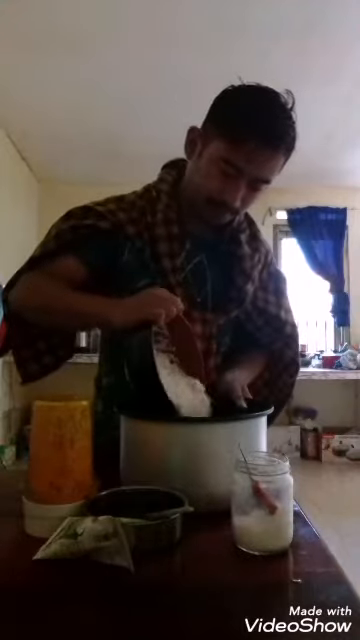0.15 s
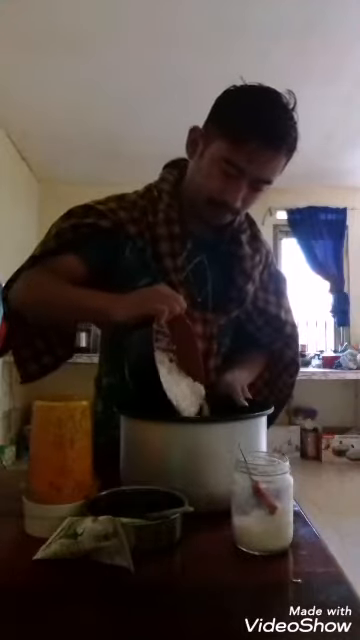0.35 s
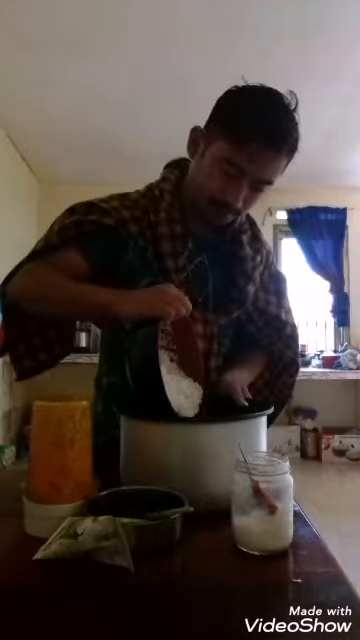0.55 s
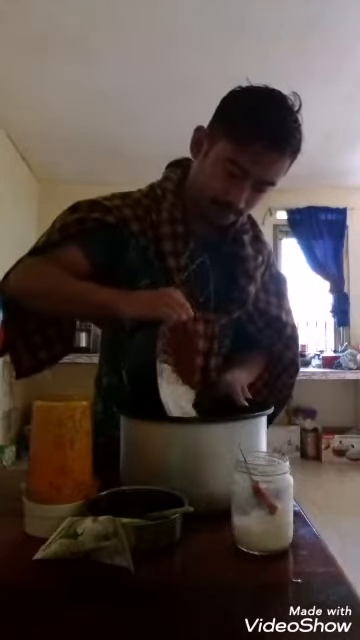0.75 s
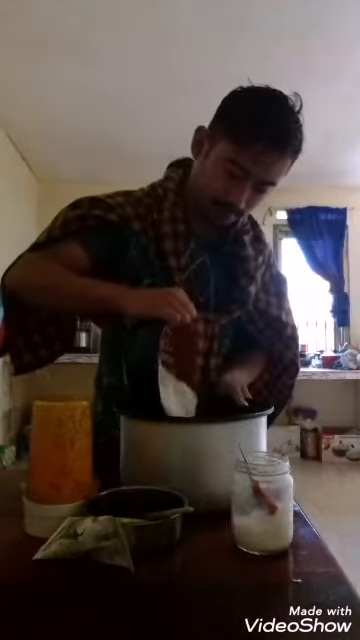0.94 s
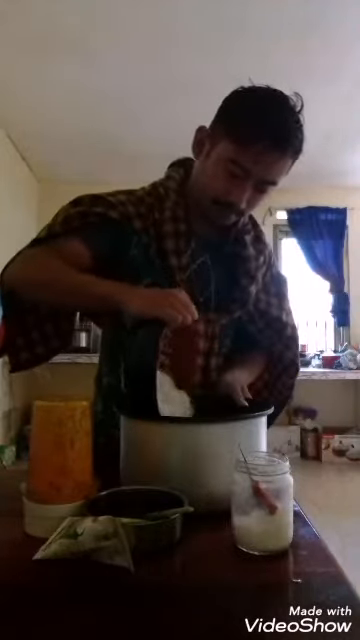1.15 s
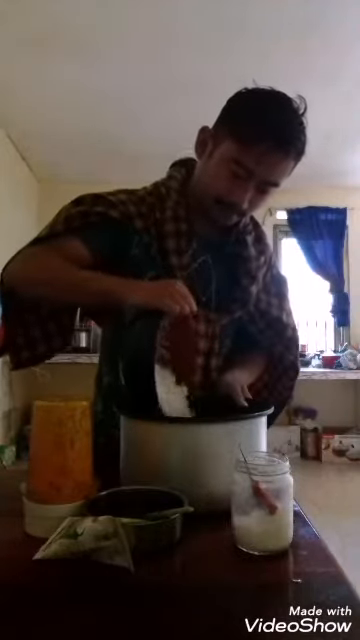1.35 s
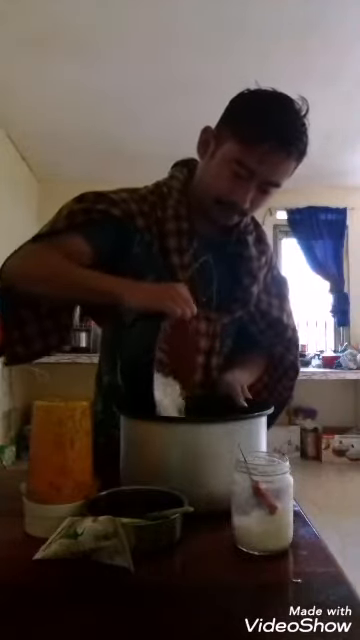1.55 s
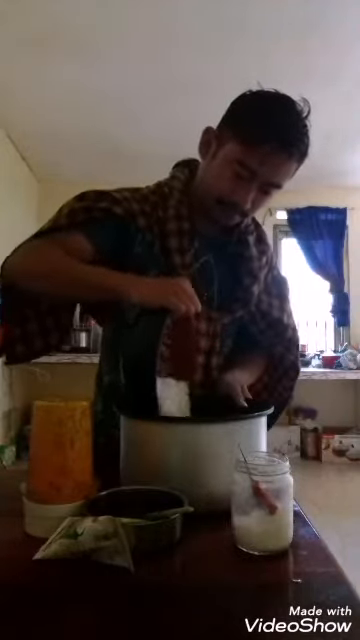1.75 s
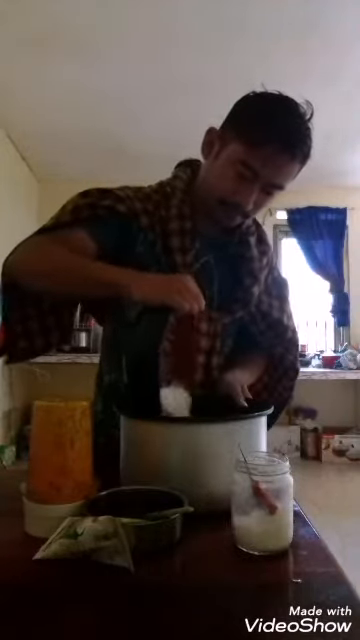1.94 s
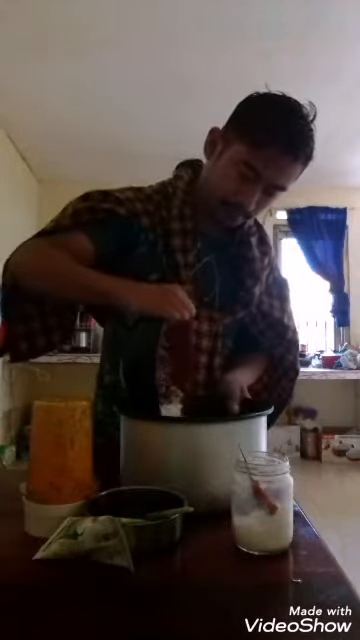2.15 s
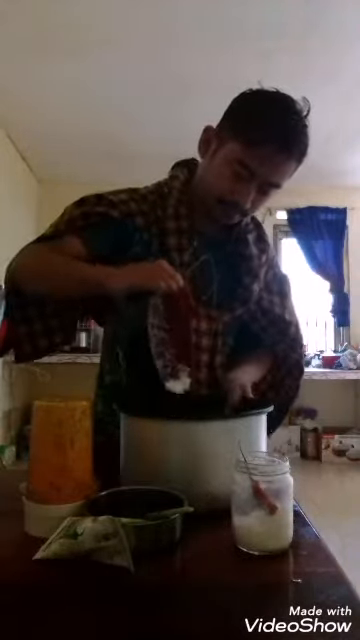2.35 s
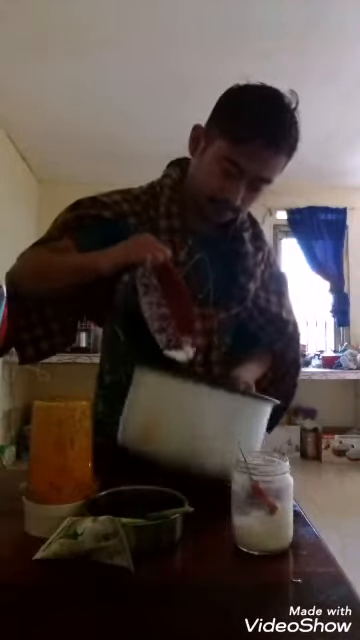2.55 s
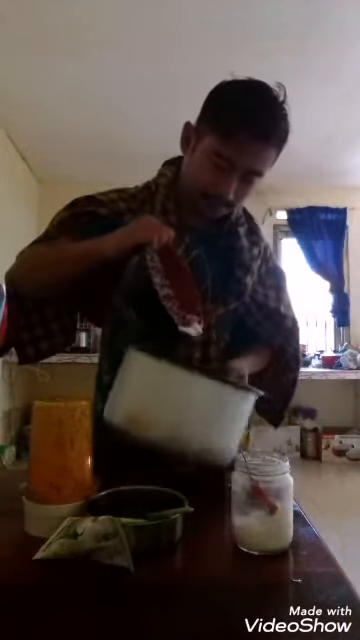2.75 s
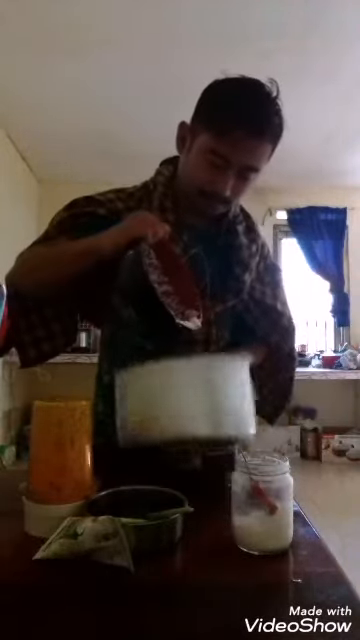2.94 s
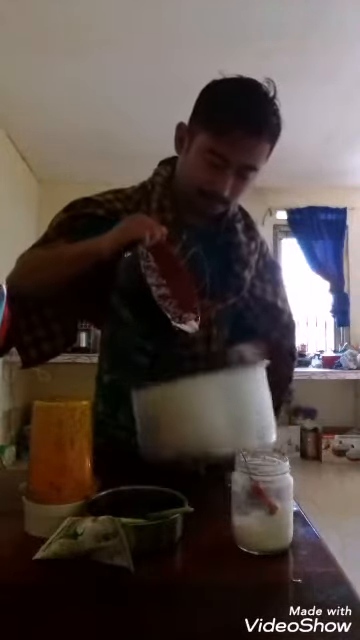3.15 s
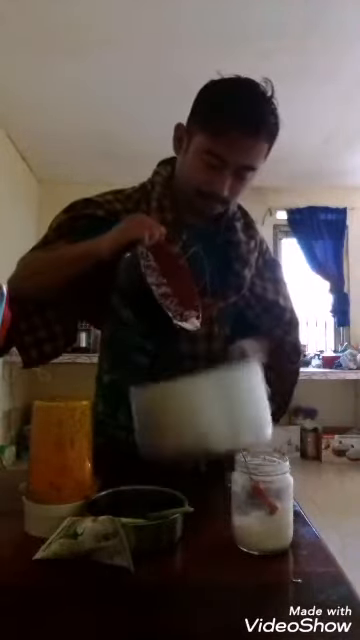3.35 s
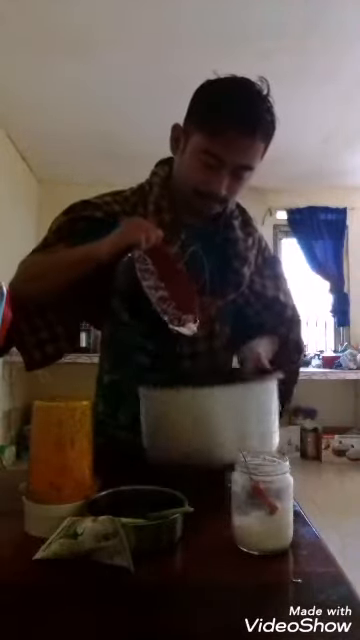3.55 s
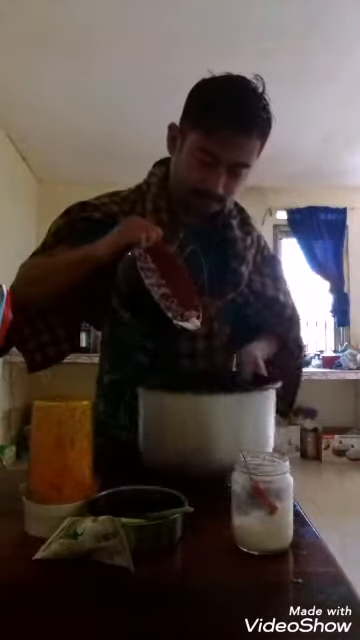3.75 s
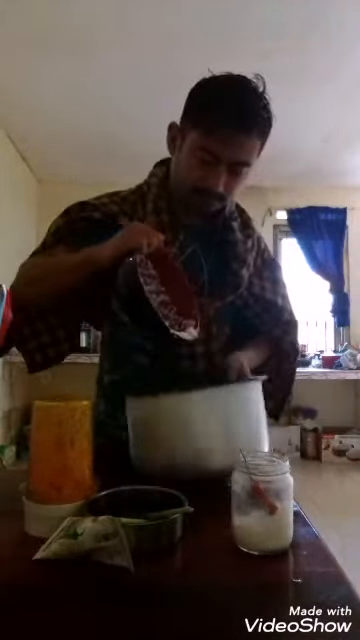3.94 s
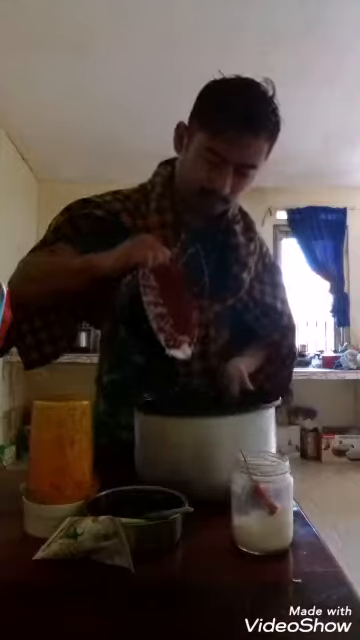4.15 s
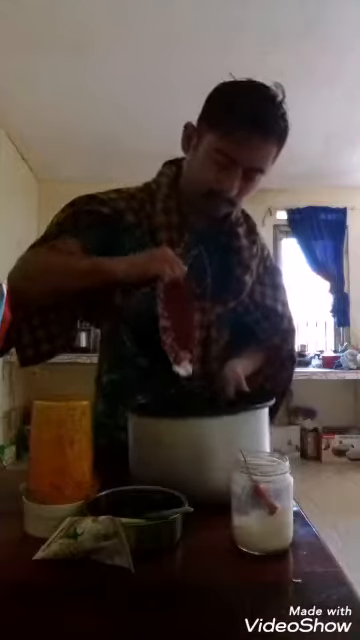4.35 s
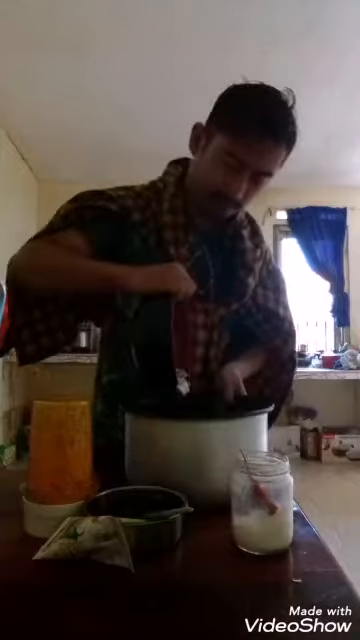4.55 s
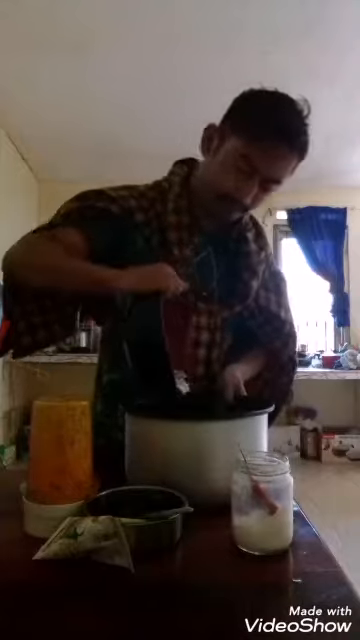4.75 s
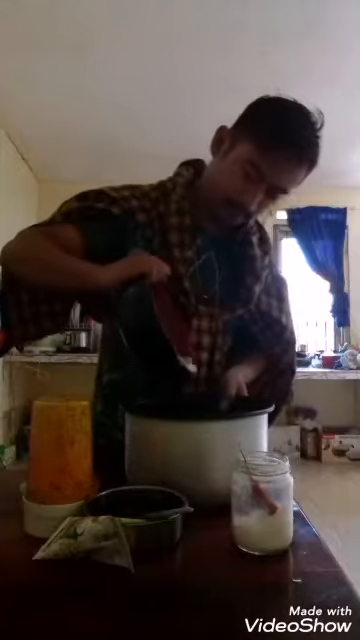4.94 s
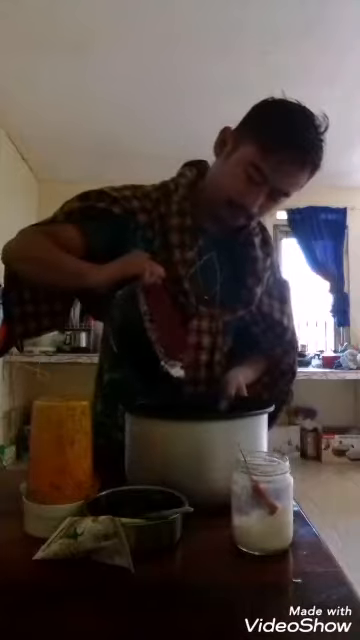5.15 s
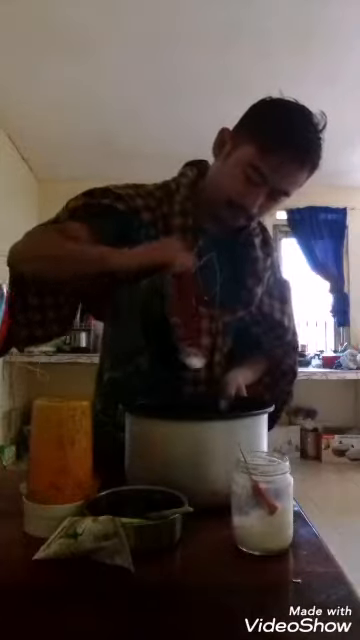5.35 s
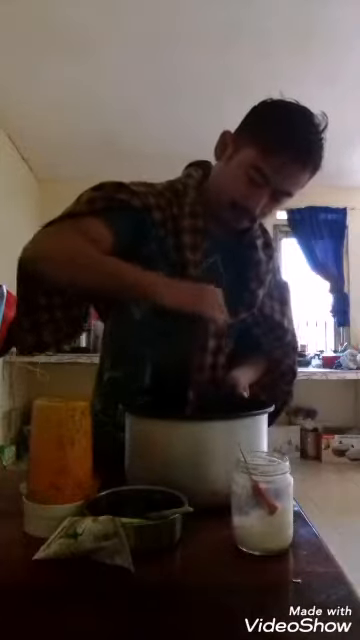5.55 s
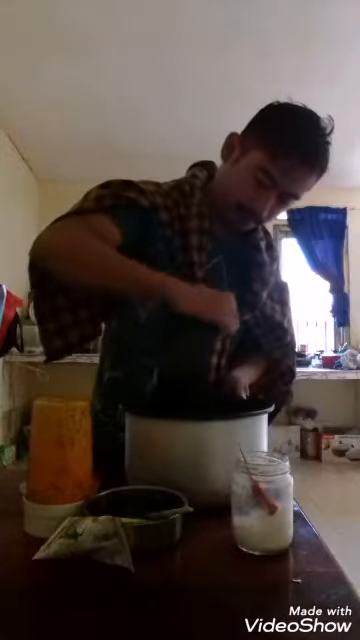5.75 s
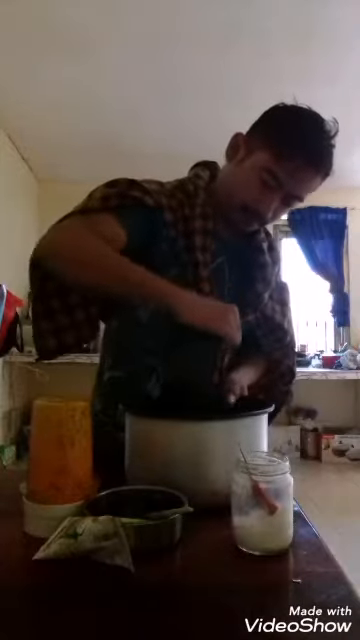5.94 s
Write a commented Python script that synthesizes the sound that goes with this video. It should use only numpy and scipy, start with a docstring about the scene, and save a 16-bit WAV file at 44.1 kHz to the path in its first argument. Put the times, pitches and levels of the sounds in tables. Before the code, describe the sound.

In a bare, ringing kitchen, pouring rice dwindles in clumps; the pot clanks, swishes, thuds rocking onto the table, and last grains tick out.

```python
"""Raw rice pours from a plastic tub into a metal pot in a bare, ringing kitchen: slides thin to a trickle.
Clumps drop out of the stream, the base knocks on the table, then the lifted pot clanks against the tub.
A swirl makes the rice swish; the pot is set down rocking on wood, and the last grains are shaken out
with the tub tapping and scraping on the rim. Grains are random impulses sent through spectra; blows are
noise bursts, with damped modes for pot and table; the room answers with a decaying noise tail."""
import sys
import numpy as np
from scipy import signal
from scipy.fft import rfft, irfft, next_fast_len
from scipy.io import wavfile
from scipy.ndimage import uniform_filter1d, map_coordinates

SR = 44100
rng = np.random.default_rng(int(sys.argv[2]) if len(sys.argv) > 2 else 0)


def dump_mix(stems):
    """Bounce the given channels to the path in sys.argv[1] as a 16-bit WAV at rate SR."""
    frames = np.atleast_2d(stems).T  # one column per channel
    limited = np.clip(frames, -1, 1)  # hard clip at full scale
    pcm = np.round(limited * 32767).astype(np.int16)
    wavfile.write(sys.argv[1], SR, pcm)


N = 265041
TIME = np.arange(N) / SR


def amp(db):
    """Level: decibels to amplitude ratio."""
    return 10 ** (np.asarray(db) / 20)


def unit(x):
    """Normalisation: the signal scaled to an rms of 1."""
    return x / np.sqrt(np.mean(x ** 2) + 1e-20)


def along(points, hz):
    """Interpolation: (Hz, value) points read on a logarithmic frequency axis."""
    point_hz, value = np.transpose(points)
    return np.interp(np.log(hz + 1), np.log(point_hz + 1), value)


def filtered(x, response):
    """Linear filtering: the spectrum is multiplied by a response of frequency."""
    m = next_fast_len(x.shape[-1] + SR // 4)
    spectrum = rfft(x, m) * response(np.fft.rfftfreq(m, 1 / SR))
    return irfft(spectrum, m)[..., :x.shape[-1]]


def add(track, s, sound):
    """Superposition: a sound is mixed into the track from time s on."""
    part = track[round(s * SR):][:len(sound)]
    part += sound[:len(part)]


def swell(s, rise, hold, fall):
    """Envelope: a Gaussian rise to 1 at time s, a hold, then exponential decay (time constant fall)."""
    rising = ((TIME - s) / rise) ** 2
    falling = np.maximum(TIME - s - hold, 0) / fall
    return np.exp(-np.where(TIME < s, rising, falling))


def steady(spectrum, db):
    """Stationary noise: random samples shaped by a spectrum, at a constant level."""
    return amp(db) * unit(filtered(rng.standard_normal(N), lambda hz: amp(along(spectrum, hz))))


def impacts(per_s, size_db):
    """Random impulse process: tiny contacts of uneven size and either sign at random times."""
    hit = rng.random(N) < per_s / SR
    size = amp(size_db * np.clip(rng.standard_normal(N), -2, 2))
    return hit * rng.choice([-1, 1], N) * size


def burst(spectrum, t, t60):
    """Transient excitation: dying noise with an evened spectrum, coloured by a minimum-phase filter."""
    m, fade = 2 * len(t), amp(-60 * t / t60)
    puff = rng.standard_normal(len(t)) * fade
    for _ in range(3):  # flatten the spectrum, then restore some of the decay
        z = rfft(puff, m)
        puff = irfft(z / (np.abs(z) + 1e-12), m)[:len(t)] * fade ** .25
    # a one-sided cepstrum makes the colour causal
    cepstrum = irfft(np.log(amp(along(spectrum, np.fft.rfftfreq(m, 1 / SR)))), m)[:len(t)]
    cepstrum[1:] *= 2
    puff = irfft(rfft(puff, m) * np.exp(rfft(cepstrum, m)), m)[:len(t)]
    return puff * np.linalg.norm(fade) / np.linalg.norm(puff)


def ring(modes, t):
    """Modal vibration: damped sines of alternate sign, their strengths varied at random by about 1 dB."""
    hz, db, t60 = np.transpose(modes)[:, :, None]
    sign = (-1) ** np.arange(len(hz))[:, None]
    level = db + rng.standard_normal(db.shape) - 60 * t / t60
    return sign * amp(level) * np.sin(2 * np.pi * hz * t)


def radiated(x, corner_hz):
    """Radiation efficiency: a small object hardly radiates deep bass."""
    return signal.lfilter(*signal.butter(2, corner_hz, "high", fs=SR), x)


# Quiet air of the house. Each row: frequency in Hz, relative density in dB per Hz.
HOUSE_COLOUR = [(30, -14.5), (70, -25.5), (158, -12.5), (228, -20.5), (347, -17), (590, -19), (1480, -18),
                (2020, -20), (2200, -18.5), (5230, -35), (12800, -36.5), (16000, -43)]


def house():
    """Background noise: the steady sound of the quiet house."""
    return steady(HOUSE_COLOUR, db=-69.5)


# Faint wide hiss. Each row: frequency in Hz, relative density in dB per Hz.
HISS_COLOUR = [(12, -31.5), (20, -7), (228, -6), (499, -2), (574, -1.5), (849, -1), (3630, -5), (4540, -6),
               (13200, -13.5), (16000, -20.5)]


def hiss():
    """Broadband noise: a steady faint hiss, heard at the sides."""
    return steady(HISS_COLOUR, db=-71.0)


def evened(tail):
    """Diffuse field: the echo keeps its fine spectral grain but favours no band."""
    z = rfft(tail, 2 * SR)
    power = np.abs(z) ** 2
    near, far = (np.abs(uniform_filter1d(power, size=width)) for width in (120, 1200))
    return irfft(z * np.sqrt(far / (near + 1e-12)))[:, :SR]


# Reverberation of the kitchen. Each row: frequency in Hz, decay time t60 in seconds.
KITCHEN_DECAY = [(120, 1), (450, 0.46), (1000, 0.85), (3000, 0.74), (6000, 0.77), (10000, 0.58),
                 (15000, 0.48)]


def kitchen(x, wet_db):
    """Reverberation: a central direct sound, answered by the bare walls from all round (mid, side)."""
    hz, t, z = signal.stft(rng.standard_normal((2, SR)), SR, nperseg=256)
    decay = amp(-60 * t / along(KITCHEN_DECAY, hz)[:, None])
    build_up = 1 - np.exp(-t / 0.0021)
    tail = evened(signal.istft(z * decay * build_up, SR, nperseg=256)[1])
    mids = np.abs(rfft(tail[0], SR))[400:4000]  # bins are 1 Hz apart
    tail = tail / np.sqrt(np.mean(mids ** 2))
    echo = amp(wet_db) * signal.oaconvolve(x[None], tail, axes=1)[:, :len(x)]
    return np.array([x + echo[0], echo[1]]) / np.sqrt(1 + amp(wet_db) ** 2)


# Wall resonances that the grains excite. Each row: centre in Hz, width in Hz, level in dB.
WALL_MODES = [(1058, 70, 3), (1620, 81, 0), (1884, 160, -9.5), (2780, 80, 9.5), (2990, 38, 4.5),
              (3376, 85, 12), (3670, 220, 7), (4680, 72, 0), (4820, 86, -6.5), (6990, 90, -10.5)]


def wall_ring(hz):
    """Resonance: the complex response of the pot's wall to a grain, a sum of band-pass modes."""
    return sum(amp(db) * 1j * hz * w / (c * c - hz * hz + 1j * hz * w) for c, w, db in WALL_MODES)


# Grains on a heap of grains. Each row: frequency in Hz, relative density in dB per Hz.
HEAP_COLOUR = [(200, -52.5), (350, -25), (520, -7), (800, -10), (1080, -2.5), (1450, -6.5), (2100, 1.5),
               (2800, -0.5), (3400, 0), (4200, -2.5), (5700, -17), (8000, -18.5), (12000, -26.5),
               (15500, -28)]


def rice_colour(hz, wall_db):
    """Superposed responses: grains on a heap of grains, with the pot's wall ringing along."""
    return amp(along(HEAP_COLOUR, hz)) + amp(wall_db) * wall_ring(hz)


def patchy(x, depth_db):
    """Spectral modulation: the colour shifts from moment to moment as grains land on different spots."""
    z = signal.stft(x, nperseg=512)[2]
    field = uniform_filter1d(rng.standard_normal(z.shape), size=6, axis=0)
    field = uniform_filter1d(field, size=10, axis=1)
    return signal.istft(z * amp(depth_db * unit(field)), nperseg=512)[1][:N]


def patter(level, body, fizz, full_rate, size_db, patchy_db, wall_db):
    """Shot noise: a stronger flow has more impacts; gains weigh wall, heap (low) and grain fizz (high)."""
    rate = np.clip(full_rate * np.sqrt(level / level.max()), 600, SR / 2)  # impacts per second
    hits = impacts(rate, size_db) / np.sqrt(rate)
    grains = patchy(filtered(hits, lambda hz: rice_colour(hz, wall_db)), patchy_db)
    low = filtered(grains, lambda hz: 1 / (1 + (hz / 800) ** 8))
    high = filtered(grains, lambda hz: 1 - 1 / (1 + (hz / 6500) ** 8))
    return level * unit(grains - low - high) + body * unit(low) + fizz * unit(high)


def flutter():
    """Random amplitude modulation: the grains leave the tub unevenly, a smooth gain."""
    knots_per_s, depth_db = 45, 2.27
    knots = rng.standard_normal(int(TIME[-1] * knots_per_s) + 2)
    return amp(depth_db * map_coordinates(knots, [TIME * knots_per_s]))


# Slides of rice out of the tub. Each row: time of full flow in seconds, level in dB, rise in seconds,
# hold in seconds, heap sound in dB relative to the level, fizz in dB relative to the level.
POUR_SLIDES = [(0, -24.5, 0.011, 0.048, -25.5, -11), (0.234, -31, 0.11, 0.056, -15, -12.5),
               (.59, -50, 0.059, 0.037, -6, -20), (.665, -46, .004, .005, -9, -13),
               (0.864, -44, 0.028, 0.079, -8, -12), (1.057, -50.5, .03, 0.034, -15.5, -12.5),
               (1.2, -43.5, 0.027, 0.0059, -9, -14.5), (1.265, -60, .008, 0.0051, -13, -3),
               (1.6, -65, 0.0031, 0.066, -23, -2.5), (1.76, -57, 0.034, 0.018, -16, -32),
               (1.913, -50.5, 0.02, 0.049, -8, -11), (2.13, -73, .02, 0.0083, -10, 10)]
SETTLE_S = 0.054  # a slide dies away with this time constant
# the thin stream between slides; heap and fizz are relative to its level
TRICKLE_DB, TRICKLE_HEAP_DB, TRICKLE_FIZZ_DB = -57, -12.5, -17
TRICKLE_END_S, TRICKLE_FADE_S = 2.054, 0.19


def stream(count=2):
    """Granular flow: a pour already in full flow in a sounding room goes on in slides over a trickle."""
    flows = [amp(db) * swell(s, rise, hold, SETTLE_S) for s, db, rise, hold, *_ in POUR_SLIDES]
    flows.append(amp(TRICKLE_DB) * swell(0, SETTLE_S, TRICKLE_END_S, TRICKLE_FADE_S))
    heap_db = [row[-2] for row in POUR_SLIDES] + [TRICKLE_HEAP_DB]
    fizz_db = [row[-1] for row in POUR_SLIDES] + [TRICKLE_FIZZ_DB]
    level = np.linalg.norm(flows, axis=0)
    body = np.linalg.norm(amp(heap_db)[:, None] * flows, axis=0)
    fizz = np.linalg.norm(amp(fizz_db)[:, None] * flows, axis=0)
    uneven = flutter()  # shared by all landing spots
    total = 0
    for _ in range(count):
        grains = uneven * patter(level, body, fizz, full_rate=3000, size_db=3.0, patchy_db=3, wall_db=-6.5)
        # a mirrored lead-in lets the room sound from the first sample
        total = total + kitchen(np.pad(grains, (SR // 4, 0), "reflect"), wet_db=0.0)
    return total[:, -N:] / np.sqrt(count)


# Grains run onto the bare wall. Each row: strongest moment in seconds, level in dB, rise in seconds,
# hold in seconds.
BARE_WALL_RUNS = [(0, -26, .01, 0.018), (1.5, -67, 0.011, 0.011), (1.77, -48, .05, 0.012),
                  (3.54, -66.5, 0.046, .03), (4.954, -66, 0.023, 0.026), (5.595, -64, 0.037, 0.017)]


def wall_runs():
    """Resonant excitation: sparse grains that hit only metal make the wall ring."""
    level = sum(amp(db) * swell(s, rise, hold, fall=0.031) for s, db, rise, hold in BARE_WALL_RUNS)
    return level * unit(filtered(impacts(per_s=1200, size_db=2), wall_ring))


# Clumps dropping onto the heap; the last two rows are light taps on the pot's wall after the pour. Each row:
# start in seconds, level in dB.
CLUMP_DROPS = [(.6640, -33), (0.841, -32.5), (1.1947, -31), (1.282, -38), (1.5062, -43.5), (1.596, -39.5),
               (1.6624, -41), (1.7095, -39.5), (1.735, -38.5), (1.7723, -34.5), (1.783, -42), (1.8, -43),
               (1.81, -42.5), (1.8225, -40), (1.8506, -41.5), (1.9294, -35), (2.1638, -47), (2.4214, -54.5),
               (2.432, -57)]
# Sound of a clump. Each row: frequency in Hz, relative density in dB per Hz.
CLUMP_COLOUR = [(200, -42), (500, -11), (1060, -0.5), (1500, -11), (2800, 3.5), (3500, 4.5), (4600, -2),
                (6000, -14), (10000, -20.5), (15000, -28.5)]


def clumps():
    """Impulsive excitation: clumps of rice make brief broad clicks that stand out of the stream; two light taps
    on the wall follow the pour."""
    out, t = np.zeros(N), np.arange(SR // 20) / SR
    for s, db in CLUMP_DROPS:
        add(out, s, amp(db) * burst(CLUMP_COLOUR, t, t60=0.033))
    return out


# Low rumble. Each row: frequency in Hz, relative density in dB per Hz.
RUMBLE_SPECTRUM = [(40, -29.5), (100, -7.5), (160, 1), (240, -9.5), (350, -4), (700, -45.5), (2000, -100)]


def rumble():
    """Low-frequency noise: a faint rumble swells and fades while the tub is held over the pot."""
    return steady(RUMBLE_SPECTRUM, db=-72) * swell(1.75, rise=1, hold=0, fall=0.76)


# The pot's base meets the table. Each row: start in seconds, level in dB, contact softness as a cut-off
# in Hz, bass corner in Hz.
BASE_KNOCKS = [(1.15, -39, 133, 120), (1.195, -39, 197, 113), (1.294, -36, 160, 152), (1.66, -35, 222, 113),
               (2.421, -49, 2770, 496), (2.431, -55, 2020, 500), (3.128, -38, 130, 100),
               (4.3203, -13, 1880, 198), (4.3325, -21.5, 5000, 251), (4.338, -29, 1500, 113),
               (4.357, -25, 5110, 114), (4.383, -39, 1500, 113), (4.443, -42, 1500, 113),
               (4.566, -24, 425, 70), (4.596, -34, 500, 80), (4.639, -23.5, 890, 400),
               (4.646, -29.5, 900, 398), (4.7152, -22, 686, 149), (4.7221, -27.5, 514, 80),
               (5.68, -42, 650, 250)]
# Modes of the table under the pot. Each row: frequency in Hz, level in dB, decay time t60 in seconds.
TABLE_MODES = [(106, -29.5, 0.047), (209, -26, 0.11), (264, -23, 0.023), (401, -21.5, 0.065),
               (510, -4, 0.043), (660, -9, 0.03), (798, -1.5, 0.02), (901, -7.5, 0.024), (1061, -10, 0.031),
               (1230, -19, 0.018), (2040, -15, 0.029)]
# Broad thud of the contact. Each row: frequency in Hz, relative density in dB per Hz.
THUD_COLOUR = [(50, -47), (120, -19), (230, 0), (360, -2.5), (550, 6), (950, 3), (1500, -6), (2600, -6),
               (4300, -13.5), (6000, -29.5), (10000, -48)]
SPOT_DETUNE = 0.044  # the modes shift by about this share as the contact moves round the base
CONTACT_CYCLES = 0.49  # a blow builds up with a time constant of this many cut-off periods


def knocks():
    """Contact stiffness: softer blows are duller; each spot rings and sounds the room differently."""
    out, t = np.zeros((2, N)), np.arange(SR // 3) / SR
    for s, db, soft_hz, bass_hz in BASE_KNOCKS:
        modes = [(hz * (1 + SPOT_DETUNE * rng.standard_normal()), level, t60)
                 for hz, level, t60 in TABLE_MODES]
        blow = ring(modes, t).sum(axis=0) + amp(-4.0) * burst(THUD_COLOUR, t, t60=0.064)
        build_up = 1 - np.exp(-t * soft_hz / CONTACT_CYCLES)
        softened = signal.lfilter(*signal.butter(1, soft_hz, fs=SR), blow * build_up)
        knock = np.zeros(N)
        add(knock, s, amp(db) * softened)
        out += kitchen(radiated(knock, corner_hz=bass_hz), wet_db=-1)
    return out


# Grains and the tub's edge tap the pot's rim. Each row: start in seconds, level in dB.
RIM_TAPS = [(4.83, -54.5), (5.576, -53), (5.589, -50), (5.643, -47), (5.6604, -36), (5.668, -36.5),
            (5.677, -38), (5.707, -39.5), (5.715, -40.5), (5.731, -40.5), (5.737, -44), (5.77, -49),
            (5.802, -57.5)]
# Scatters of stray grains on the rim. Each row: start in seconds, length in seconds, typical level in dB.
STRAY_GRAINS = [(1.498, 0.27, -55), (2.154, .11, -43.5), (3.24, .06, -46), (5.673, 0.045, -56)]
# A tap on the rim. Each row: frequency in Hz, relative density in dB per Hz.
TAP_COLOUR = [(200, -20), (600, -22), (1100, -13), (2000, -21), (3000, -21.5), (3280, 1), (3550, 1),
              (3850, 3), (4300, -9), (4600, -4.5), (5600, -11), (7000, -24), (7700, -12.5), (9000, -33),
              (15000, -34)]
STRAYS_PER_S, STRAY_SCATTER_DB = 50, 2


def ticks():
    """Short impact on metal: clear taps and random stray grains, strongest in the rim's band."""
    out, t = np.zeros(N), np.arange(SR // 20) / SR
    for s, db in RIM_TAPS:
        add(out, s, amp(db) * burst(TAP_COLOUR, t, t60=0.015))
    for start, length, db in STRAY_GRAINS:
        for s in np.arange(start, start + length, 1 / STRAYS_PER_S):
            late = rng.random() / STRAYS_PER_S
            gain = amp(db + STRAY_SCATTER_DB * rng.standard_normal())
            add(out, s + late, gain * burst(TAP_COLOUR, t, t60=0.0098))
    return out


# Modes of the pot. Each row: frequency in Hz, level in dB, decay time t60 in seconds.
POT_MODES = [(342, -16, 0.08), (504, -3.5, 0.049), (612, -5, 0.026), (773, -3.5, 0.026),
             (1003, -4.5, 0.036), (1285, -19, 0.081), (1610, -17, 0.025), (2590, -23, 0.045),
             (3327, -6, 0.036), (3484, -8, 0.031), (4050, -9.5, 0.022), (4200, -32, 0.016),
             (4560, -12.5, 0.026), (5370, -12.5, 0.016), (5740, -23.5, 0.022), (6350, -25, 0.01393)]
# Hard crack of the blow. Each row: frequency in Hz, relative density in dB per Hz.
CRACK_COLOUR = [(60, -41), (200, -11), (400, -4), (700, 2.5), (1050, -4.5), (1400, -12.5), (1900, -18),
                (2400, -17), (2900, -21), (3500, -12), (5000, -25), (7300, -23.5), (8500, -32.5),
                (15000, -57)]
CLANK_AT_S, CLANK_DB = 2.7052, -16.5


def clank():
    """Damped modes: the tub hits the pot, a hard crack and a brief ring damped by the hand and the rice."""
    out, t = np.zeros(N), np.arange(SR // 2) / SR
    metal = amp(4.5) * ring(POT_MODES, t).sum(axis=0)
    crack = amp(3) * burst(CRACK_COLOUR, t, t60=0.027)
    build_up = 1 - np.exp(-t / 0.00071)
    add(out, CLANK_AT_S, amp(CLANK_DB) * (metal + crack) * build_up)
    return radiated(out, corner_hz=334)


# Rice jumping against the wall. Each row: frequency in Hz, relative density in dB per Hz.
JOLT_COLOUR = [(300, -15), (600, 3), (1100, 0), (1500, -4), (2000, 4), (2500, 0), (2950, -4), (3600, 1),
               (4300, 7), (5700, -15), (7500, -22), (11000, -43)]
JOLT_DB, JOLT_RISE_S, JOLT_FALL_S = -44, 0.0036, 0.072


def jolt():
    """Shock excitation: the blow makes the rice rattle in the pot just after the clank."""
    level = amp(JOLT_DB) * swell(CLANK_AT_S + 2 * JOLT_RISE_S, JOLT_RISE_S, 0, JOLT_FALL_S)
    hits = impacts(per_s=1600, size_db=0.5)
    return level * unit(filtered(hits, lambda hz: amp(along(JOLT_COLOUR, hz))))


# Rice thrown by a swirl of the pot or a shake of the tub. Each row: strongest moment in seconds, level
# in dB, heap sound in dB relative to the level, fizz in dB relative to the level.
RICE_THROWS = [(3.142, -47, -8.5, -10.5), (3.252, -52, -10, -20), (3.306, -56.5, -8, -5.5),
               (3.645, -37.5, -17, -11), (5.69, -60.5, -7, 3), (5.738, -60.5, -9, 4.5),
               (5.784, -63, -19, 0)]
# Rice sliding round the wall, against falling rice. Each row: frequency in Hz, gain in dB.
SLIDING_TINT = [(700, -0.5), (1050, -2), (1450, 2.5), (2000, -3.5), (2700, 0.5), (3500, 2)]


def swishes(count=3):
    """Sliding friction: each throw swells and settles, on spots that each sound the room differently."""
    gains = 0
    for s, db, heap_db, fizz_db in RICE_THROWS:
        parts_db = db + np.array([[0], [heap_db], [fizz_db]])
        gains = gains + amp(parts_db) * swell(s, rise=0.023, hold=0, fall=0.016)
    total = 0
    for _ in range(count):
        grains = patter(*gains, full_rate=4000, size_db=2.0, patchy_db=1.0, wall_db=-17)
        total = total + kitchen(grains, wet_db=-1.0)
    return filtered(total / np.sqrt(count), lambda hz: amp(along(SLIDING_TINT, hz)))


# The base rolls on the wood between rocks. Each row: strongest moment in seconds, level in dB, rise in
# seconds, fall in seconds.
BASE_ROLLS = [(4.54, -55.5, .04, 0.022), (4.665, -44, 0.018, .03), (4.75, -47, 0.037, .025)]
# Chatter on the wood. Each row: frequency in Hz, relative density in dB per Hz.
CHATTER_COLOUR = [(100, -26), (220, -13), (400, 4), (700, -6.5), (1200, -1), (1650, -15), (3000, -33),
                  (6000, -41.5)]


def rolls():
    """Rolling contact: quick small impacts as the pot rolls on the edge of its base."""
    level = sum(amp(db) * swell(s, rise, 0, fall) for s, db, rise, fall in BASE_ROLLS)
    hits = impacts(per_s=260, size_db=2.5)
    return level * unit(filtered(hits, lambda hz: amp(along(CHATTER_COLOUR, hz))))


def rustle():
    """Granular shifting: a faint, slowly swelling rustle while the tub is tipped for the last grains."""
    level = amp(-78.5) * swell(5.2, rise=0.26, hold=1, fall=1)
    body, fizz = level * amp(9), level * amp(-22)
    return patter(level, body, fizz, full_rate=5000, size_db=3, patchy_db=2, wall_db=-2)


# Spread to the sides. Each row: frequency in Hz, side gain in dB.
SIDE_SPREAD = [(100, -12.5), (500, -36), (1200, -27), (3300, -26), (6000, -17), (9000, -13.5), (14000, -12)]


def scene():
    """Mid-side stereo: all sources in the kitchen; the close microphones hear almost alike."""
    mid, side = (stream() + kitchen(wall_runs(), wet_db=5) + kitchen(clumps(), wet_db=2)
                 + knocks() + kitchen(ticks(), wet_db=2) + kitchen(clank() + jolt(), wet_db=2.5)
                 + swishes() + kitchen(rolls(), wet_db=1.5) + kitchen(rustle(), wet_db=9.5))
    mid = mid + house() + rumble()
    side = filtered(side, lambda hz: amp(along(SIDE_SPREAD, hz))) + hiss()
    return np.array([mid + side, mid - side])


TOP_HZ = 15650


def record(dry):
    """Band limiting: the phone keeps nothing above its top frequency."""
    return filtered(dry, lambda hz: hz < TOP_HZ)


dry = scene()
out = record(dry)
dump_mix(out)
```